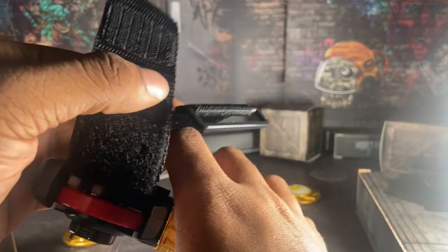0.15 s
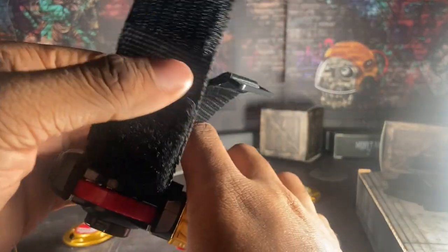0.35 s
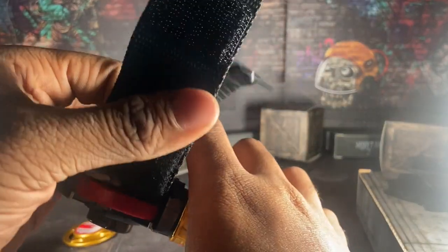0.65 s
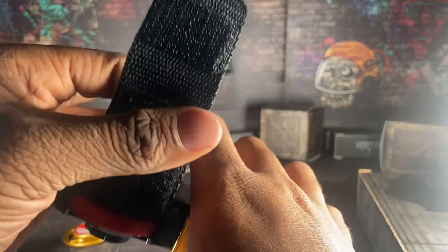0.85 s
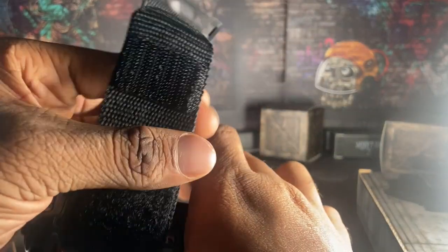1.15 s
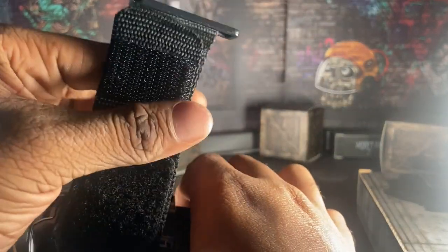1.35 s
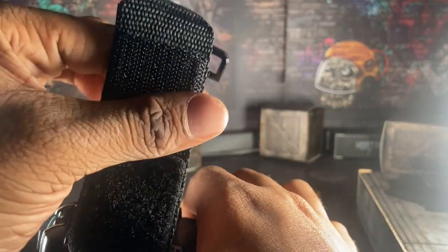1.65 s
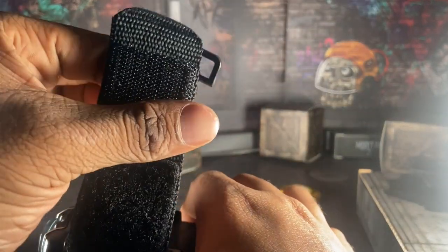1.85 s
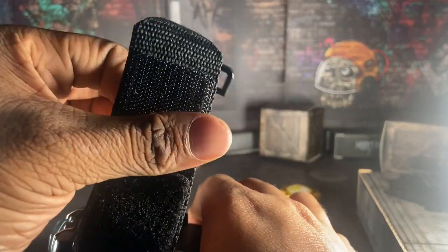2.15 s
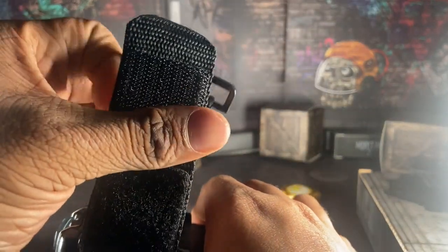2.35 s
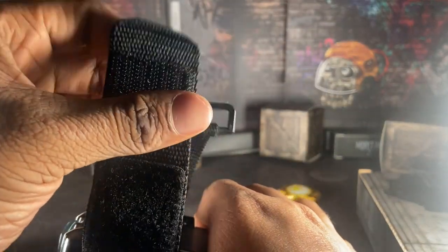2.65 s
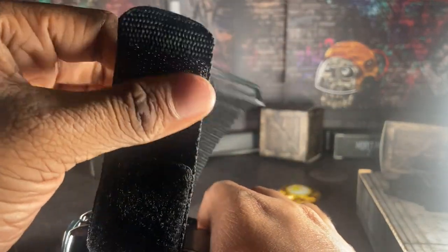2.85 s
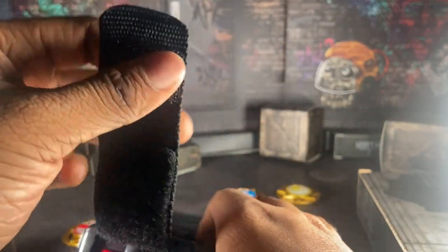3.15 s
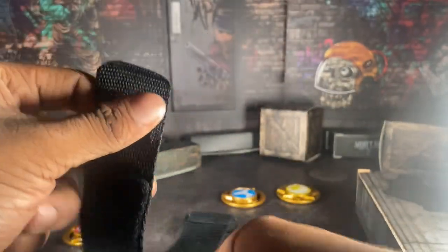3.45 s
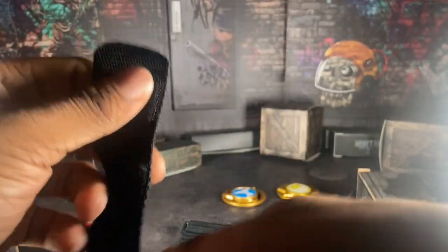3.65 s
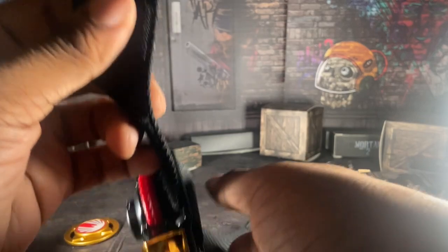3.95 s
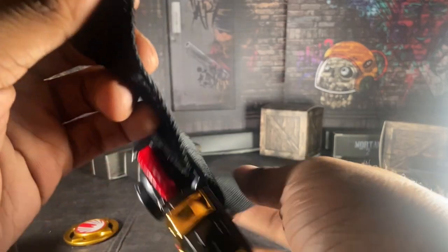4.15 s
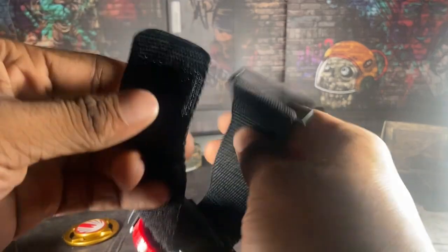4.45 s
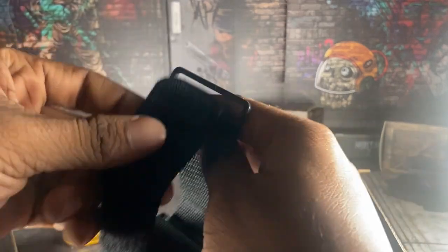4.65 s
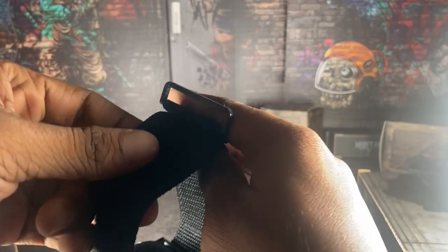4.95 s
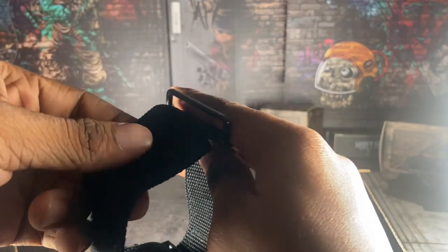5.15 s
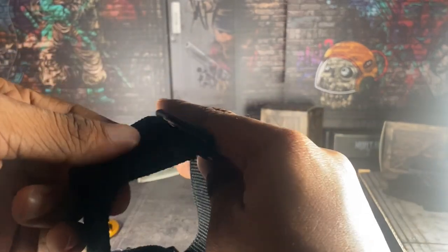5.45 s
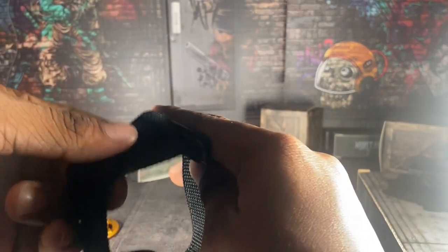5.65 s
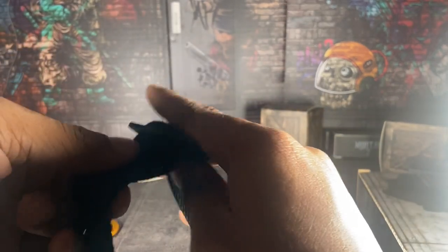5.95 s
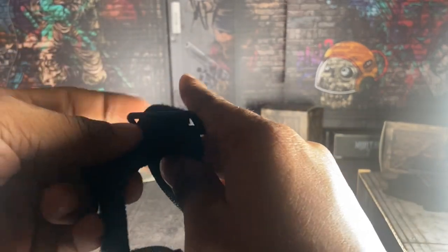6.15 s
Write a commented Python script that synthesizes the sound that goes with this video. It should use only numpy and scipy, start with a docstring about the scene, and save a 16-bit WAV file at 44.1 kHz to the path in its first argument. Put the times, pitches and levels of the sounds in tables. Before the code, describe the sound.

A quiet small room with faint air and low hum, heard very close at a table top in slightly uneven stereo. From 0 to 1 s a webbing strap is rubbed in barely audible airy strokes, with soft bumps and a faint scrape near 0.9 s. At 1.04 s a small plastic click and tick, brighter hiss, then sparse faint taps to 2.8 s, including a light knock at 2.24 s. Sharp ticks at 2.83-2.93 s precede the loudest plastic clack at 3.04 s, with quick rebounds and thuds. Another rattling cluster at 3.4-3.7 s comes as the gadget drags, grating until 3.95 s. Hissy strap swishes grow to 4.43 s, with a deep table thump at 4.42 s. From 4.6 s tiny crisp hook ticks crowd irregularly, densest at 5.1-5.5 s, thinning, then returning with soft clacks around 5.8-6.3 s.

```python
"""Hands handle a webbing strap with a plastic gadget, close to a phone on a table top (6.3 s).
From the start: room wash and hum, noise slips for the webbing, a murmuring table top; modal thuds from 0.2 s.
Coarse scrapes peak at 0.9 and 1.6 s; from 1 s the casing clacks (modes, crack, rattle) and hooks tick
(short tone bursts with fizz), both with a short tail. The hardest clack comes at 3.04 s, then the gadget
is dragged until 3.95 s; from 4.6 s ticks crowd together over softer clacks, to the end."""
import sys
import numpy as np
from scipy import signal
from scipy.fft import rfft, irfft, next_fast_len
from scipy.io import wavfile
from scipy.ndimage import uniform_filter1d

SR = 44100
rng = np.random.default_rng(int(sys.argv[2]) if len(sys.argv) > 2 else 0)


def output_pcm(signal):
    """Save a mono or channel-first signal as 16-bit PCM at the path in sys.argv[1].

    Samples are clipped to [-1, 1] before scaling.
    """
    pcm = np.clip(np.atleast_2d(signal).T, -1, 1) * 32767
    wavfile.write(sys.argv[1], SR, np.round(pcm).astype(np.int16))


def gain_from_decibels(decibels):
    """Convert decibel values to linear amplitude factors."""
    exponent = np.asarray(decibels, float) / 20
    return 10 ** exponent


N = 276948

# Room air spectrum. Each row: frequency in Hz, relative level in dB.
ROOM_AIR = [(25, -25.5), (50, -6), (150, -7.5), (330, -11.5), (450, -23), (900, -30.5), (8000, -41),
            (15000, -52), (16500, -74)]
ROOM_DB = -62.5  # rms
# Room hum. Each row: frequency in Hz, mean level in dB rms.
HUM = [(124, -73.5), (168, -78.5), (250, -74.5), (334, -72.5)]
# Fine hiss of the weave. Each row: frequency in Hz, relative level in dB.
WEAVE = [(2500, -17.5), (4000, -10), (6600, 2.5), (8000, 6), (10000, -0.5), (13600, -2.5), (15600, -9.5),
         (16600, -46.5)]
# Lower rasp of the webbing, also the casing's rattle. Each row: frequency in Hz, relative level in dB.
RASP = [(450, -4), (1050, -7.5), (1300, -2.5), (1700, -0.5), (2500, -3), (3600, -2.5), (4300, -7),
        (6000, -14.5)]
# Strokes of finger or strap over the webbing. Each row: firmest contact in seconds, swell in seconds,
# fade in seconds, level of the fine hiss in dB, lower rasp relative to hiss in dB.
STROKES = [(0.05, 0.12, 0.27, -61.5, -1), (0.35, 0.22, 0.11, -53.5, -4), (0.5, 0.21, 0.24, -60.5, -1.5),
           (0.631, 0.058, 0.084, -49.5, -10.5), (0.81, 0.094, 0.19, -59.5, -7),
           (0.889, 0.025, 0.1, -57, 0.5), (1.0, 0.082, 0.11, -46.5, -12), (1.052, 0.028, 0.057, -49.5, 1.5),
           (1.13, 0.054, 0.22, -46.5, -9), (1.24, 0.075, 0.13, -54, -6), (1.47, 0.2, 0.2, -63.5, 5),
           (1.7, 0.11, 0.062, -66.5, 2.5), (1.82, 0.06, 0.11, -69.5, 13), (1.93, 0.096, 0.097, -57, -2),
           (2.171, 0.031, 0.19, -55, 1.5), (2.27, 0.086, 0.2, -67, 15.5), (2.46, 0.19, 0.23, -68, 8.5),
           (2.648, 0.024, 0.068, -54.5, 2.5), (2.76, 0.057, 0.17, -59.5, 5), (2.84, 0.13, 0.018, -49.5, -7),
           (3.03, 0.015, 0.068, -50.5, 5), (3.09, 0.054, 0.076, -52.5, -1), (3.2, 0.013, 0.18, -53.5, 6),
           (3.285, 0.18, 0.023, -57.5, 13.5), (3.401, 0.065, 0.28, -51, 1.5),
           (3.47, 0.032, 0.044, -32, 8.5), (3.561, 0.076, 0.08, -43.5, 5), (3.641, 0.052, 0.023, -39, 0),
           (3.71, 0.085, 0.13, -49.5, 3), (3.84, 0.22, 0.17, -48.5, -2.6), (3.971, 0.043, 0.074, -44, -1.5),
           (4.08, 0.092, 0.078, -44, -8), (4.2, 0.1, 0.1, -42.5, -11), (4.297, 0.017, 0.13, -39.5, -8),
           (4.38, 0.11, 0.04, -32, -13), (4.429, 0.077, 0.042, -31.5, -2.5),
           (4.53, 0.076, 0.067, -50.5, -5.5), (4.58, 0.049, 0.055, -45, -1), (4.65, .05, 0.072, -55, -1.5),
           (4.721, 0.013, 0.026, -38, -8.5), (4.772, 0.024, 0.029, -42.5, -5),
           (4.9, 0.15, 0.1, -63.5, -5.5), (5.02, 0.066, 0.05, -60.5, 2.5), (5.2, 0.12, 0.2, -62, -3.5),
           (5.41, .08, 0.2, -63.5, -9.5), (5.669, 0.099, 0.082, -66, -4.5),
           (5.75, 0.051, 0.052, -64.5, -3.5), (5.84, 0.039, 0.15, -58.5, -3), (5.96, 0.14, 0.17, -54, -6.5),
           (6.07, 0.096, 0.12, -65.5, 10), (6.18, 0.082, 0.13, -54, -20), (6.26, 0.055, 0.027, -43, 1.5)]
STROKE_DEPTH_DB = 20  # drop over one swell or one fade
# Modes of the table top. Each row: frequency in Hz, relative level in dB, t60 in seconds.
TABLE_MODES = [(52.5, -9, 0.29), (71, -1.5, 0.18), (78.6, 4, 0.15), (89.4, 6, 0.18), (110, 4, 0.11),
               (123.75, 0.5, 0.27), (156, 4, 0.11), (180, 1.5, 0.046), (217.6, 0.5, 0.082), (262, 2, 0.07),
               (327, 0, .06)]
# Bumps on the table top. Each row: start in seconds, level in dB, pitch the blow favours in Hz.
THUDS = [(0.219, -45, 67.5), (0.249, -39, 48.3), (1.078, -43, 112), (1.23, -38, 98.4), (1.521, -41.5, 160),
         (1.68, -41.5, 123), (2.253, -32, 116), (2.46, -39, 85), (2.539, -43, 143), (2.648, -43, 68),
         (2.753, -41.5, 65.6), (2.839, -37.5, 118), (3.044, -12.5, 250), (3.047, -20, 52.5),
         (3.076, -10.5, 252), (3.192, -26, 280.4), (3.395, -32.5, 140), (3.458, -7.5, 147),
         (3.486, -12.5, 64), (3.583, -16, 159), (3.624, -10.5, 86), (3.682, -24, 84.5), (3.767, -16, 93),
         (3.944, -32.5, 134), (4.33, -34.5, 115), (4.413, -17, 238), (4.419, -7.5, 106.6),
         (4.782, -37.5, 88.7), (5.425, -27, 93.8), (5.647, -28.5, 88.6), (5.804, -24.5, 103),
         (5.841, -28.5, 110), (5.989, -36, 85), (6.092, -30, 138)]
REST_DB = -62.5  # hands resting on the table top
# Coarse fingertip scrapes. Each row: firmest contact in seconds, swell in seconds, fade in seconds,
# level in dB, pitch of the patch in Hz.
SCRAPES = [(0.885, 0.022, 0.076, -52, 1490), (1.63, 0.19, 0.16, -65.5, 3240)]
# Knocks on the casing. Each row: start in seconds, level in dB, lower modes relative to that in dB,
# crack relative to that in dB, pitch the struck spot favours in Hz.
CLACKS = [(1.039, -29, -23, -6, 1860), (1.523, -48, -12.5, -9, 3100), (1.572, -49.5, -18, -25, 1440),
          (1.669, -61.5, 11.5, -14, 1610), (2.2427, -31.5, 1.5, -16, 1340),
          (2.5411, -62.5, 17.5, -10, 1380), (2.7616, -31, -40, -33, 2220), (2.814, -31.5, -11, -11, 1740),
          (2.8286, -39, 5.5, -9, 1300), (3.0407, 0, -7, -19.5, 2010), (3.0588, -14.5, 1, -22, 2030),
          (3.0714, -7.5, -3, -18, 2050), (3.0795, -13.5, -8.5, -12, 3160), (3.184, -8.5, -17, -17, 2120),
          (3.227, -28, -2, -31, 1980), (3.394, -44.5, 12.5, 5, 1690), (3.4525, -10, -0.5, -2.5, 1510),
          (3.461, -15.5, -1.5, -11, 2060), (3.4726, -14.5, 2.5, -4, 1600), (3.483, -23.5, 1.5, -6.5, 1500),
          (3.554, -29, -8, -28.5, 1730), (3.583, -21, 9.5, -2.5, 2100), (3.5899, -13, -2.5, -15, 1440),
          (3.605, -14.5, -25, -36, 1600), (3.623, -25.5, 5.5, -5.5, 1604), (3.634, -22.5, -8, -11, 1700),
          (3.646, -22, -18, -14, 1500), (3.666, -38.5, 12, -12.5, 1393), (3.6834, -35, -17, -10, 2040),
          (3.698, -32.5, 3, -25, 2010), (3.764, -39, 9.5, -1, 2480), (3.9743, -32.5, -3, -16, 3240),
          (4.0818, -40.5, 6, -19, 3150), (4.1498, -30.5, -17, -10.5, 2040),
          (4.1859, -39.5, -4.5, -11, 1540), (4.4137, -22, 11.5, -8.5, 1600), (4.4295, -22, 1, -17, 1540),
          (4.472, -36, -9, -1.5, 1880), (4.576, -40, 4.5, -0.5, 2980), (5.1687, -44, -7, 0.5, 2090),
          (5.4169, -44.5, 6, -1, 2400), (5.6366, -55.5, 14, -6, 2000), (5.653, -52, 11.5, -0.5, 1390),
          (5.806, -45.5, 5, -33, 1656), (5.8161, -33, -7, -10.5, 1790), (5.83, -34.5, -6, -21, 1450),
          (5.8387, -33, -1, -12, 2410), (5.9762, -43, -2.5, -17, 3150), (6.0893, -33.5, -1, -13, 1380),
          (6.097, -29.5, -7, -7.5, 1710), (6.2141, -53.5, 12, 5.5, 2820), (6.2634, -37.5, 3, 6, 3650)]
# Upper modes of the casing. Each row: nominal frequency in Hz, relative level in dB, nominal t60 in seconds.
CASING_HIGH = [(1435, -3, 0.026), (1690, -1, 0.022), (1917, -6.5, 0.011), (1930, 0, 0.025),
               (2100, 2.5, 0.017), (2429, 0, 0.012), (2560, 2, 0.014), (3210, 7, 0.02), (4440, 3.5, 0.0098),
               (5100, -7, 0.012)]
# Lower modes of the casing. Each row: nominal frequency in Hz, relative level in dB, t60 in seconds.
CASING_LOW = [(247.8, -7.5, 0.13), (321.2, -4.5, 0.068), (425, -3.5, 0.021), (439.7, -7.5, 0.094),
              (525, 0, 0.04), (663, 2, 0.031), (763.4, -6.5, 0.05), (867, -3, 0.032), (985, -10, 0.049),
              (1141, -11.5, 0.048)]
# Crack of a knock. Each row: frequency in Hz, relative level in dB.
CRACK = [(2000, -13.5), (4500, -3), (8000, -3), (12000, -11.5), (15600, -20.5), (16600, -58.5)]
# Hooks springing free. Each row: time of the snap in seconds, level in dB, pitch in Hz.
TICKS = [(1.0407, -26.5, 8450), (1.458, -41.5, 7400), (1.4678, -37, 7400), (2.8343, -15, 7700),
         (2.87, -17.5, 8900), (2.8933, -28.5, 8200), (2.914, -21, 8750), (2.932, -20.5, 10000),
         (3.3744, -20.5, 7900), (3.39, -34.5, 8800), (3.4116, -20, 8300), (3.4191, -21, 8850),
         (3.4454, -29.5, 9000), (3.5092, -19.5, 8710), (3.8048, -20.5, 7500), (3.8455, -28, 7600),
         (4.1947, -29, 11460), (4.2197, -22.5, 11300), (4.2231, -32.5, 9000), (4.2394, -23.5, 6400),
         (4.2895, -31.5, 5500), (4.299, -25.5, 6000), (4.308, -25, 7000), (4.635, -23, 11000),
         (4.638, -19, 9500), (4.706, -30, 8300), (4.7161, -15, 8300), (4.7749, -14.5, 9200),
         (4.798, -35, 7900), (4.9346, -16, 9700), (4.977, -38.5, 7580), (5.0034, -30.5, 7600),
         (5.0127, -31.5, 6400), (5.0885, -32, 8600), (5.12, -39, 9080), (5.1415, -36.5, 8000),
         (5.1515, -20.5, 12760), (5.1585, -20.5, 10700), (5.1687, -25, 11820), (5.2071, -23, 12500),
         (5.213, -19, 9780), (5.2317, -28, 10330), (5.2771, -18, 11900), (5.3088, -21, 11300),
         (5.3238, -26, 9800), (5.339, -36.5, 9800), (5.3568, -32.5, 8950), (5.3766, -17, 10970),
         (5.3964, -23, 11500), (5.4156, -27.5, 9830), (5.443, -24.5, 12350), (5.476, -36, 10300),
         (5.7328, -31, 9170), (5.8593, -30, 9100), (5.8791, -33.5, 12100), (5.9025, -22, 13900),
         (5.9187, -19, 10560), (6.0452, -21, 10250), (6.0921, -22.5, 9500), (6.2292, -27.5, 11000),
         (6.2335, -20.5, 9800), (6.2604, -15, 7500), (6.2661, -20, 7900)]
DRAG_S = 3.19, 3.95  # gadget dragged about on the table top: start, end
# Microphone ports. Each row: frequency in Hz, phase lead of the left in radians, left minus right in dB.
PORTS = [(0, -.15, -1.5), (300, -.15, -2), (1000, -.1, -4), (5000, -.9, -4.5), (6500, 0, -2),
         (7200, 1.3, .5), (8500, 3.05, 0), (9700, 3.3, 0), (11400, 6.1, 0), (12800, 6.4, 0),
         (14600, 9.3, 0), (22050, 9.4, 0)]
LEFT_RIGHT = np.array([[1], [-1]])  # side signal: added left, taken away right


def level(x, rms_db):
    """Scale to an rms level."""
    return x * gain_from_decibels(rms_db) / np.sqrt(np.mean(x ** 2))


def colour(x, points):
    """Shape the spectrum along (Hz, dB) points, straight lines over log frequency."""
    hz, db = np.transpose(points)
    size = next_fast_len(x.shape[-1])
    f_hz = np.arange(size // 2 + 1) * SR / size
    gain_db = np.interp(np.log(f_hz + 1), np.log(hz), db, -120, -120)
    return irfft(rfft(x, size) * gain_from_decibels(gain_db), size)[..., :x.shape[-1]]


def walk(rate_hz):
    """Random levels held 1 / rate_hz seconds and slewed twice."""
    k = int(SR / rate_hz)
    held = np.repeat(rng.standard_normal(N // k + 1), k)
    return 1.2 * uniform_filter1d(uniform_filter1d(held, k), k)[:N]


def ring(hz, db, t60_s, push_s, length_s, scatter_turns):
    """Sum of decaying modes that build over push_s from scattered phases, peak 1."""
    t = np.arange(round(length_s * SR))[:, None] / SR
    build = np.sin(np.pi / 2 * np.minimum(t / push_s, 1))
    decay = np.exp(-np.log(1000) * t / t60_s)
    turns = hz * t + scatter_turns * rng.random(len(hz))
    y = (gain_from_decibels(db) * build * decay * np.sin(2 * np.pi * turns)).sum(axis=1)
    return y / np.abs(y).max()


def add(out, start_s, y):
    """Lay a sound in at start_s."""
    i = max(int(start_s * SR), 0)
    out[..., i:i + y.shape[-1]] += y[..., :N - i]


def spread(x, wide, top_hz):
    """Two nearly alike copies: below top_hz the second noise adds left and takes away right."""
    side = signal.sosfilt(signal.butter(4, top_hz, fs=SR, output="sos"), x[1])
    return x[0] + wide * side * LEFT_RIGHT


def hump_db(t, peak_s, swell_s, fade_s):
    """Rounded contact contour: drops away ever faster to either side of the peak."""
    return -STROKE_DEPTH_DB * np.where(t < peak_s, (peak_s - t) / swell_s, (t - peak_s) / fade_s) ** 2


def room():
    """A faint wash of air as shaped noise, and a hum of sines wavering in level and phase."""
    t = np.arange(N) / SR
    hum = 0
    for hz, db in HUM:
        waver = np.sqrt(2) * gain_from_decibels(db + 1.9 * walk(5.1))
        hum = hum + waver * np.sin(2 * np.pi * hz * t + 0.58 * walk(7.6))
    air = colour(spread(rng.standard_normal((2, N)), 0.49, 6000), ROOM_AIR)
    return level(air, ROOM_DB) + hum


def strokes():
    """Hiss and rasp levels in dB over time; overlapping strokes add in power."""
    t = np.arange(0, N + 64, 64) / SR
    peak_s, swell_s, fade_s, hiss_db, rasp_re_db = np.transpose(STROKES)[:, :, None]
    hiss = gain_from_decibels(2 * (hiss_db + hump_db(t, peak_s, swell_s, fade_s)))
    rasp = hiss * gain_from_decibels(2 * rasp_re_db)
    return [np.interp(np.arange(N) / SR, t, 10 * np.log10(p.sum(axis=0) + 1e-12)) for p in (hiss, rasp)]


def webbing():
    """Threads catch in dense tiny slips of uneven size; the ribs of the weave make them flutter."""
    hiss_db, rasp_db = strokes()
    catch_db = 3.06 * np.minimum(rng.exponential(size=N), 4.5) * (rng.random(N) < .3)
    slips = rng.standard_normal((2, N)) * gain_from_decibels(catch_db)
    slips = spread(slips * gain_from_decibels(1.7 * walk(60) + 2.0 * walk(250)), 0.55, 5900)
    hiss = level(colour(slips, WEAVE), 0) * gain_from_decibels(hiss_db)
    # the contact patch keeps changing: rasp colour wanders octave by octave;
    # the more rasp over hiss, the coarser and lower
    coarse_db = 0.18 * np.clip(rasp_db - hiss_db, -12, 4)
    raw = colour(slips, RASP)
    rasp = 0
    for k in range(4):
        low_hz = 400 * 2 ** k
        octave = signal.butter(2, [low_hz, 2 * low_hz], "band", fs=SR, output="sos")
        rasp = rasp + signal.sosfiltfilt(octave, raw) * gain_from_decibels(2.1 * walk(8) + coarse_db * (1.3 - k))
    return hiss + level(rasp, 0) * gain_from_decibels(rasp_db) + drag(slips)


def table():
    """Soft blows swell the board's modes near the favoured pitch, the lows last; resting hands murmur."""
    out = np.zeros((2, N))
    hz, mode_db, t60_s = np.transpose(TABLE_MODES)
    for start_s, db, blow_hz in THUDS:
        octaves = np.log2(hz / blow_hz)
        favour_db = -np.where(octaves > 0, 14.0, 36.0) * octaves ** 2
        thud, side = (ring(hz, mode_db + favour_db, t60_s, 1.4 / hz, .32, 0.35) for _ in range(2))
        add(out, start_s, gain_from_decibels(db) * (thud + 0.13 * side * LEFT_RIGHT))
    board = [(30, -21.0), (50, 3.5), (120, -0.5), (200, -13), (350, -18.0), (600, -32.0)]  # (Hz, dB)
    murmur = level(colour(spread(rng.standard_normal((2, N)), 0.22, 1000), board), 0)
    # every blow leaves the board shaking for a while
    fade = np.exp(-1 / (.07 * SR))
    shaking = gain_from_decibels(-7.0) * signal.lfilter([1 - fade], [1, -fade], np.abs(out[0]))
    return out + murmur * (gain_from_decibels(REST_DB + 1.8 * walk(5.5)) + shaking)


def scrapes():
    """A fingertip catches on the ribs: coarse slips ring one patch; the first swells fast, the second slowly."""
    out = np.zeros(N)
    t = np.arange(N) / SR
    catch_db = 5.1 * rng.exponential(size=N) * (rng.random(N) < .1)
    slips = rng.standard_normal(N) * gain_from_decibels(catch_db + 2.7 * walk(70))
    for peak_s, swell_s, fade_s, db, hz in SCRAPES:
        band = signal.butter(2, [hz / 1.2, hz * 1.26], "band", fs=SR, output="sos")
        patch = level(signal.sosfilt(band, slips), db)
        out += patch * gain_from_decibels(hump_db(t, peak_s, swell_s, fade_s))
    return out


def strike(modes, push_s, narrow_db, spot_hz, length_s):
    """Ring casing modes, each a little detuned and uneven; narrow_db per octave squared favours spot_hz."""
    hz, mode_db, t60_s = np.transpose(modes)
    db = mode_db - narrow_db * np.log2(hz / spot_hz) ** 2 + 3 * rng.standard_normal(len(hz))
    return ring(hz * (1 + 0.025 * rng.standard_normal(len(hz))), db, t60_s, push_s, length_s, 0.84)


def casing():
    """The shell rings at its own modes, struck at a new spot each time, with a crack and a loose rattle."""
    out = np.zeros((2, N))
    length_s = .09
    t = np.arange(round(length_s * SR)) / SR
    for start_s, db, low_db, crack_db, spot_hz in CLACKS:
        high, high_side = (strike(CASING_HIGH, .0018, 34., spot_hz, length_s) for _ in range(2))
        low, low_side = (strike(CASING_LOW, .004, 0, spot_hz, length_s) for _ in range(2))
        noise = rng.standard_normal((2, len(t)))
        decay = np.exp(-t / 0.0024) + gain_from_decibels(-4.5) * np.exp(-t / 0.0041)
        crack = level(colour(noise[0], CRACK), 0) * decay * np.minimum(t / 0.00064, 1)
        rattle = level(colour(noise[1], RASP), -14.0) * np.exp(-t / 0.01)
        # the shell radiates a little differently to either side
        side = (0.16 * high_side + 0.3 * gain_from_decibels(low_db) * low_side) * LEFT_RIGHT
        add(out, start_s, gain_from_decibels(db) * (high + rattle + gain_from_decibels(low_db) * low + gain_from_decibels(crack_db) * crack + side))
    return out


def hooks():
    """Each hook snaps back in about two cycles, shivers briefly, and the loops settle with a faint fizz."""
    out = np.zeros(N)
    t = np.arange(-20, 500) / SR
    for snap_s, db, hz in TICKS:
        chance = rng.standard_normal((2, len(t)))
        snap = np.exp(-(t / 0.00015) ** 2) * np.cos(2 * np.pi * hz * t + chance[0, 0])
        body = gain_from_decibels(-22.5) * np.exp(-np.abs(t) / 0.00015) * np.sin(2 * np.pi * 0.49 * hz * t)
        settle = gain_from_decibels(-12.0) * np.exp(-np.abs(t) / 0.00075) + gain_from_decibels(-24) * np.exp(-np.abs(t) / 0.0089)
        fizz = settle * np.diff(chance[1], prepend=0)
        add(out, snap_s + t[0], gain_from_decibels(db) * (snap + body + fizz))
    return out


def walls(x):
    """A short dull tail from the table top and the near walls: decaying noise, one per side."""
    t = np.arange(int(.3 * SR)) / SR
    dull = [(100, 7.0), (2000, -6.5), (6000, -3.5), (16000, -16.0)]  # (Hz, dB)
    t60_s = 0.17
    tail = colour(rng.standard_normal((2, len(t))), dull) * np.exp(-np.log(1000) * t / t60_s)
    tail = tail / np.sqrt(np.sum(tail ** 2, axis=1, keepdims=True)) * np.minimum(t / 0.002, 1)
    return gain_from_decibels(-12.5) * signal.fftconvolve(x[None], tail, axes=1)[:, :N]


def drag(slips):
    """Dragging sets the casing's modes near 2 kHz humming: the slips excite them."""
    hz, mode_db, t60_s = np.transpose(CASING_HIGH)
    near_db = mode_db - 300.0 * np.log2(hz / 1985) ** 2
    response = ring(hz, near_db, 0.94 * t60_s, 0.0023, .12, 0.5)
    shell = signal.fftconvolve(slips, response[None], axes=1)[:, :N]
    # 0 mid-drag, 1 at either end
    off = np.abs(np.arange(N) / SR - np.mean(DRAG_S)) / (np.ptp(DRAG_S) / 2)
    return level(shell, -56) * gain_from_decibels(3.3 * walk(23) - 20 * np.minimum(off, 2) ** 12)


def scene():
    """All sources; the sharp ones also reach the phone by way of the walls."""
    sharp = casing() + hooks()
    return room() + webbing() + table() + scrapes() + sharp + walls(sharp.mean(axis=0))


def low_pass(x):
    """Removes everything above the highest recorded frequency."""
    return signal.sosfilt(signal.butter(12, 16480, fs=SR, output="sos"), x)


def record(dry):
    """Two ports, unequal mostly below 7 kHz, drifting out of phase above; no deep bass; clips at full scale."""
    hz, lead_rad, balance_db = np.transpose(PORTS)
    f_hz = np.arange(N // 2 + 1) * SR / N
    # half the difference to each port
    half = gain_from_decibels(np.interp(f_hz, hz, balance_db) / 2) * np.exp(.5j * np.interp(f_hz, hz, lead_rad))
    ports = irfft(rfft(dry) * np.array([half, 1 / half]), N)
    ports = signal.sosfilt(signal.butter(4, 42, "high", fs=SR, output="sos"), ports)
    return low_pass(np.clip(ports, -1, 1))


dry = scene()
out = record(dry)
output_pcm(out)
```